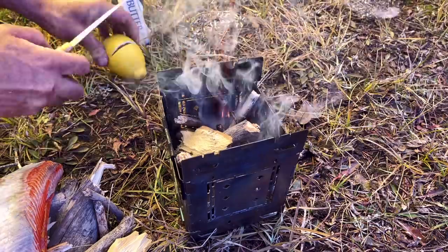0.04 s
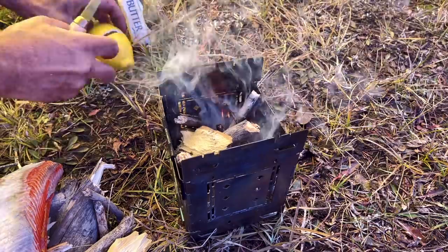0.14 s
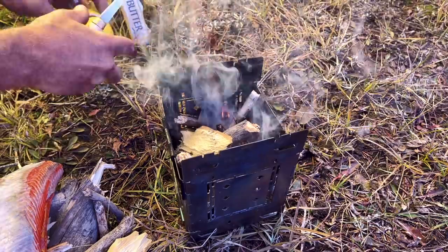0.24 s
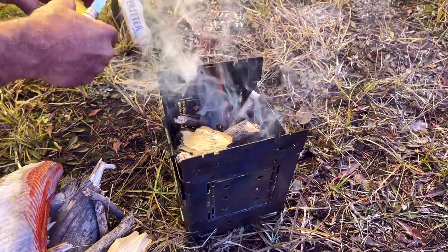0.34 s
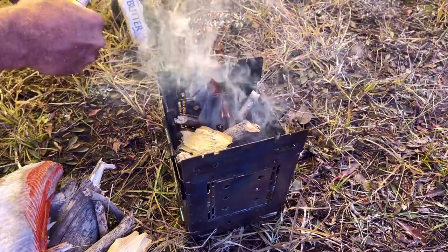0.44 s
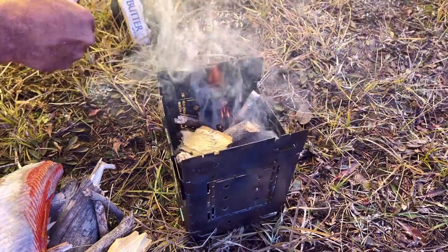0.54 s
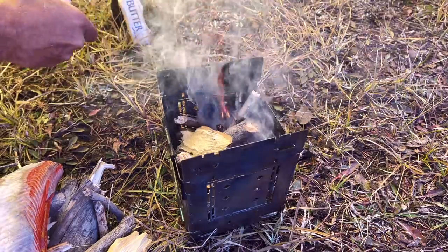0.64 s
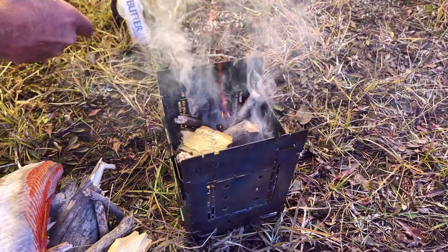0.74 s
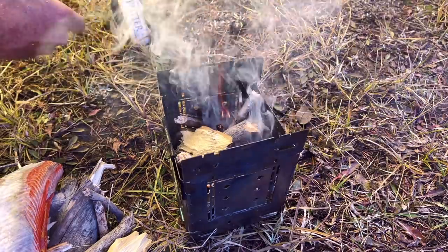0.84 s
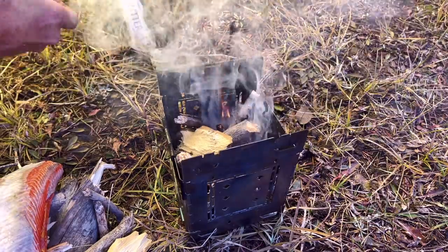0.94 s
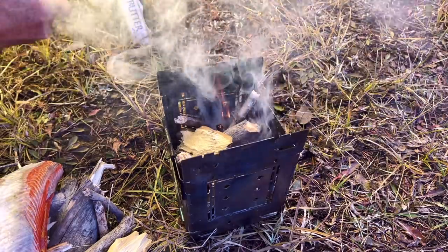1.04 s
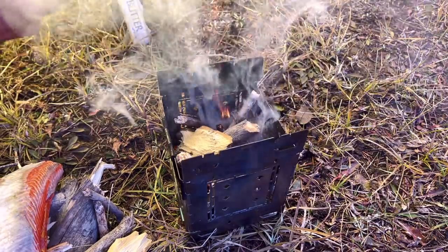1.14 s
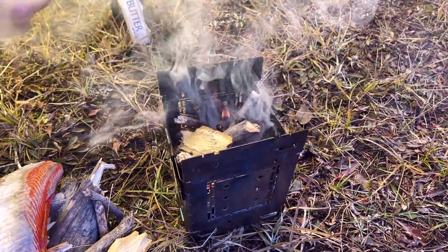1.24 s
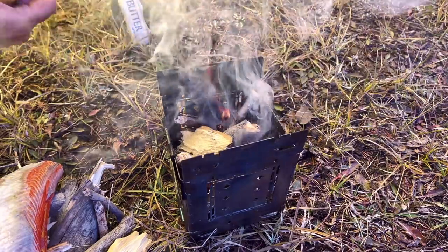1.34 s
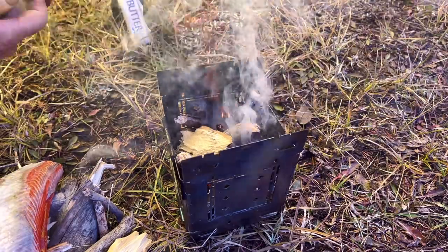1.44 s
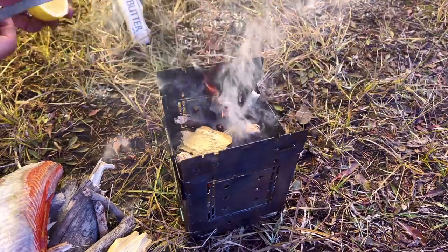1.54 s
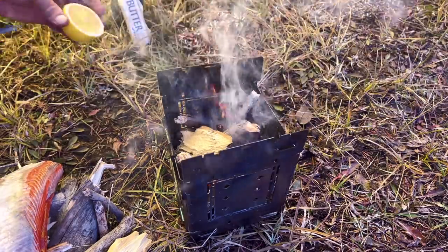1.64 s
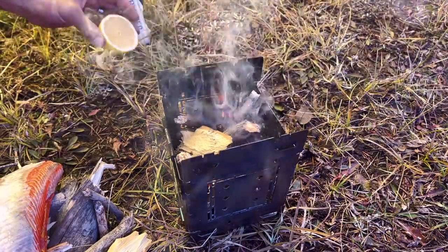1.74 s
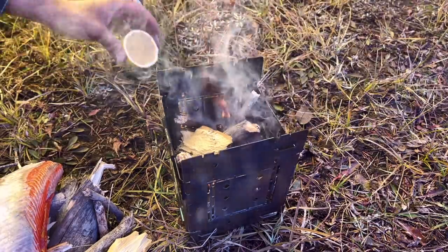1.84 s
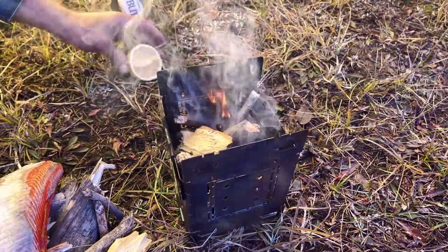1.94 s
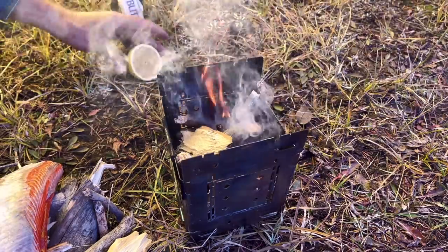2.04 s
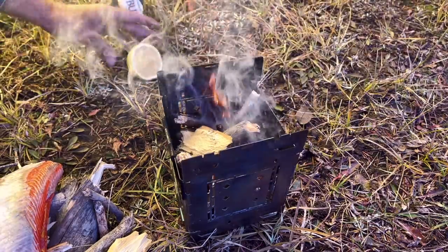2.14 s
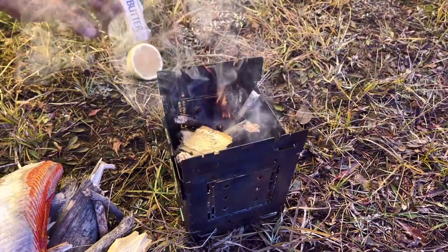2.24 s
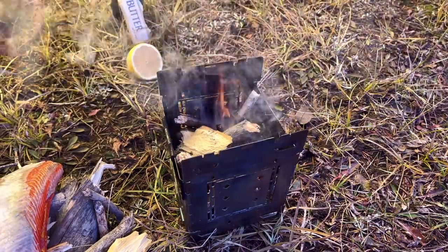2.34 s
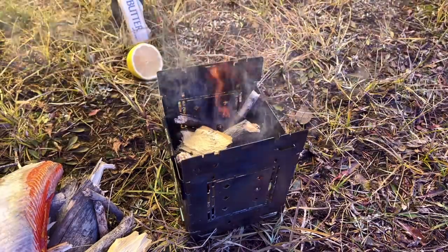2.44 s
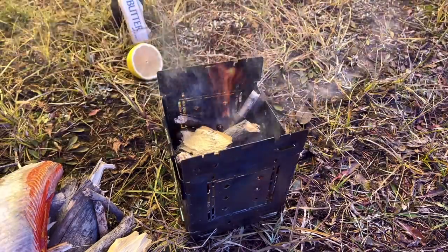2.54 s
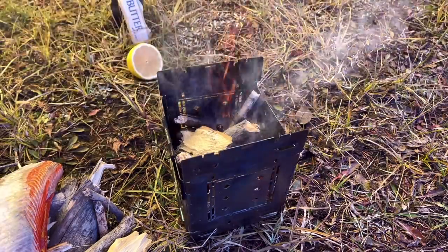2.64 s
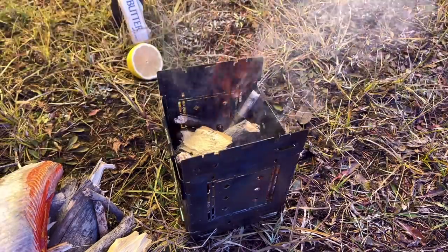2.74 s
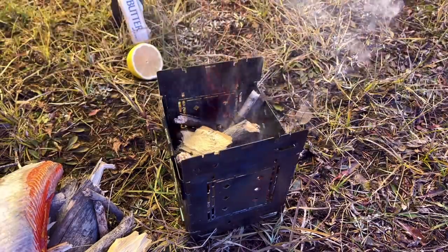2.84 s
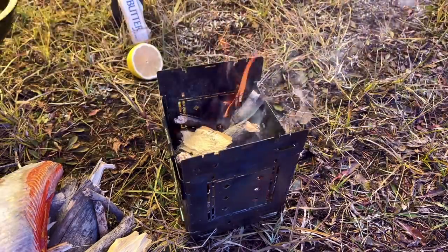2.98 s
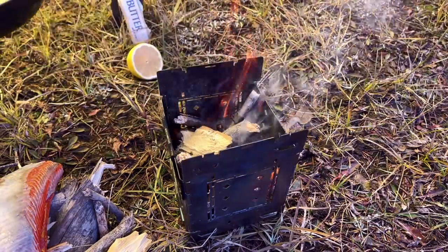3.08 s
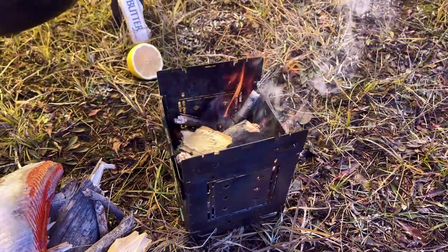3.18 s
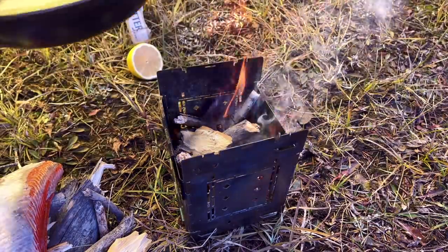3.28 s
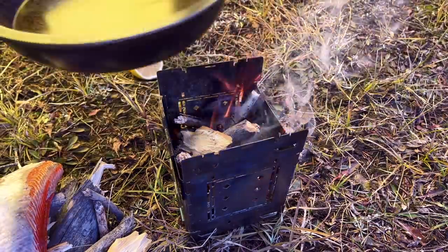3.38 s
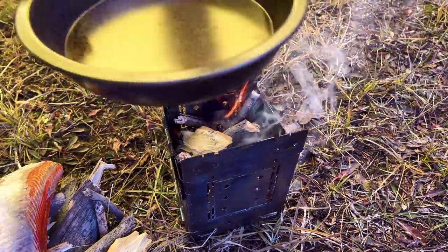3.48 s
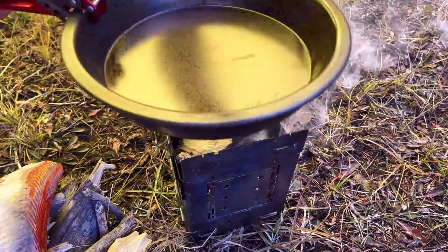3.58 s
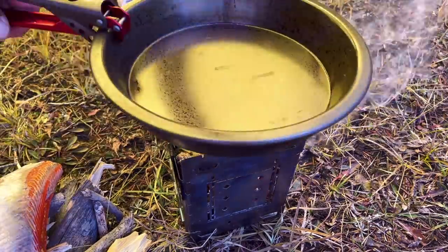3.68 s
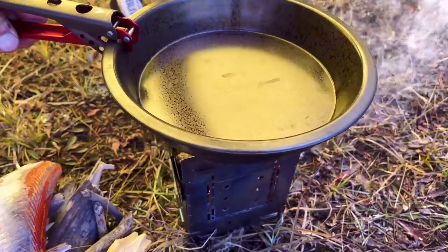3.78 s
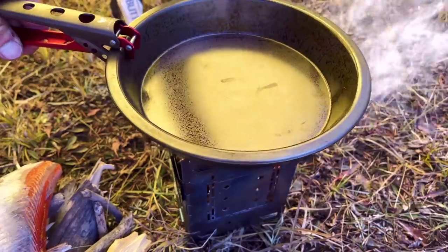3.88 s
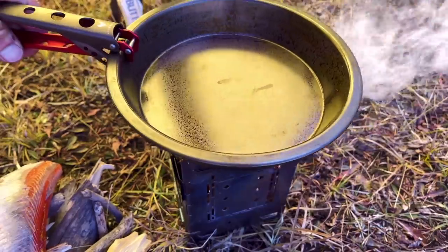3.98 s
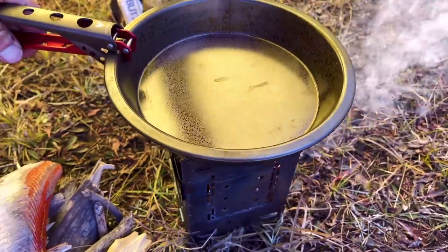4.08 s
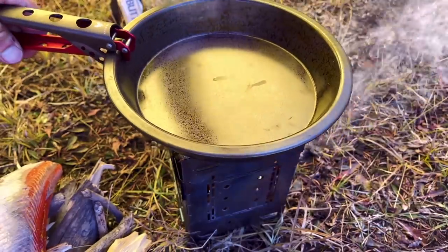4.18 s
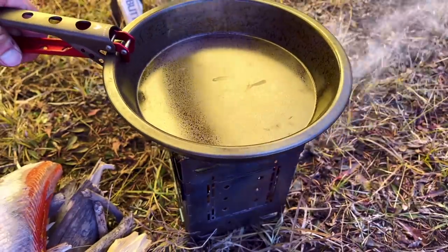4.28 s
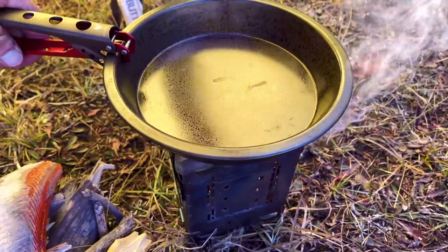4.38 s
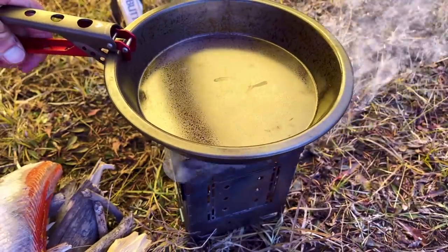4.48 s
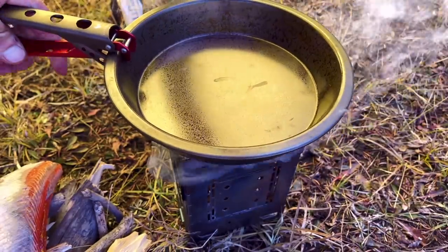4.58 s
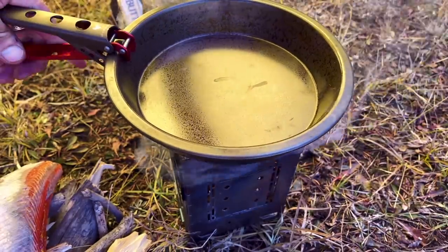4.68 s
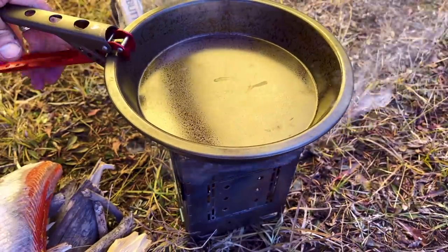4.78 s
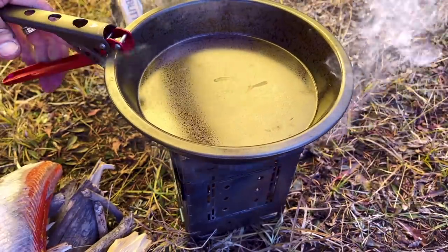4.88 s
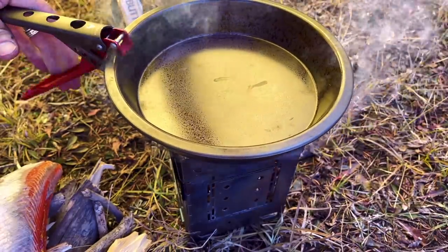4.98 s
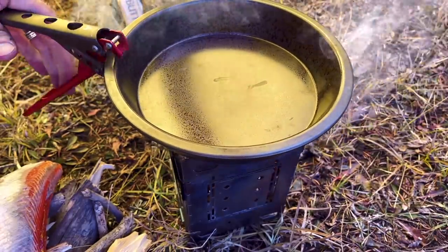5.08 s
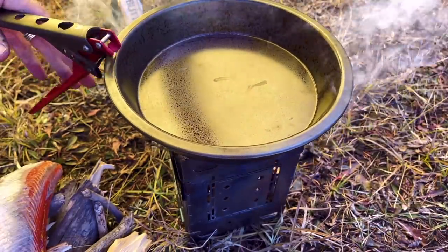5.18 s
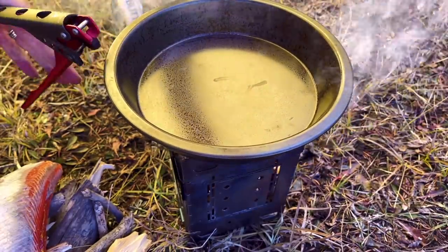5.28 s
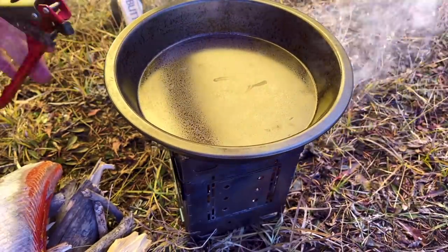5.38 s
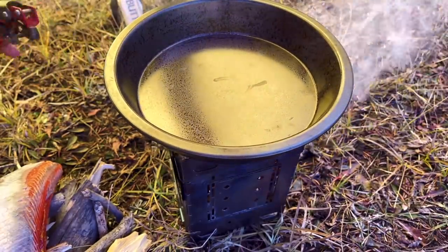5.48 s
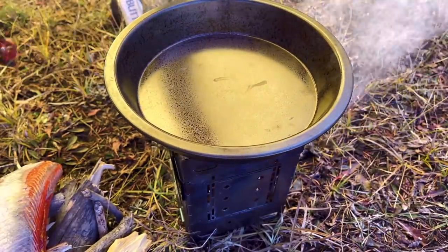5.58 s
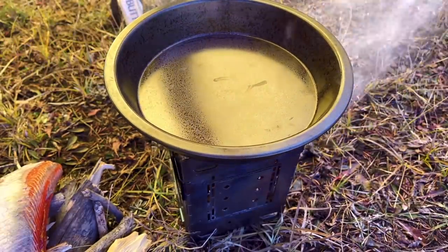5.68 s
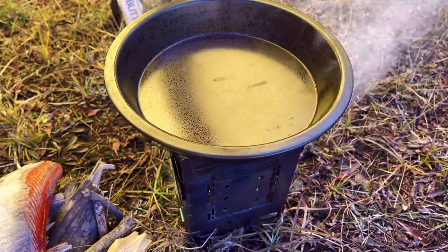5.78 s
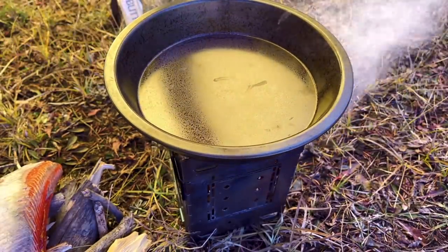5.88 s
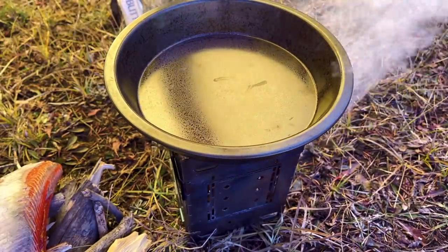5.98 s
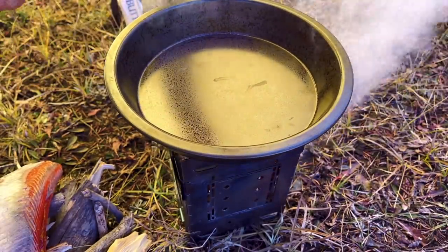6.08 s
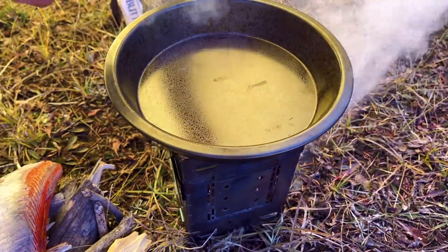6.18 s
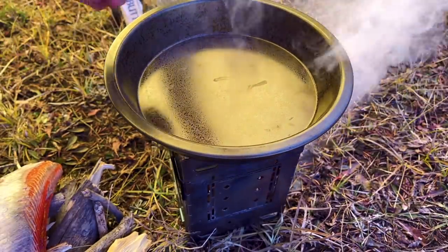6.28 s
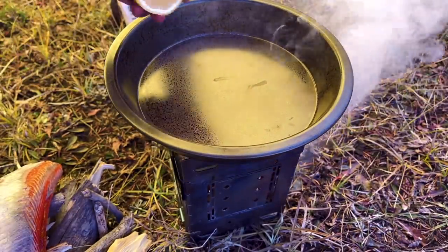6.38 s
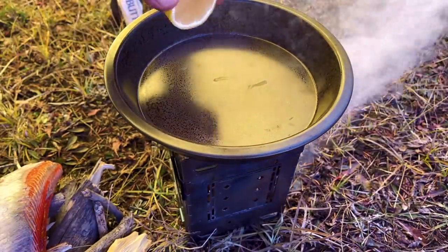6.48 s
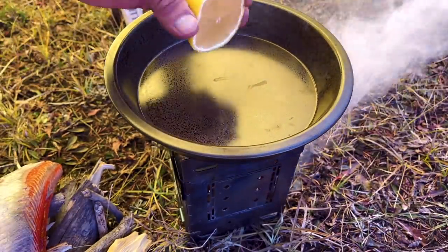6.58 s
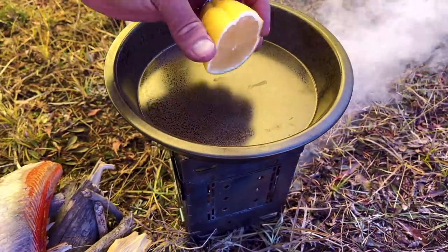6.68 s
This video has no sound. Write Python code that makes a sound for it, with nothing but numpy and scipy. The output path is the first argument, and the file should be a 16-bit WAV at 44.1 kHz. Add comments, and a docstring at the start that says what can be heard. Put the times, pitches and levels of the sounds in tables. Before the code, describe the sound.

A wood fire crackles and hisses in a small metal stove; a steel pan clanks down on top, then a sizzle swells.

```python
"""On grass, close to a small sheet-metal stove, twigs burn: flames flutter, embers rustle, steam from the
sap hisses and whistles, and bursting gas pockets pop and excite the stove's box. A steel pan is set down
with two clanks, slid into place, and its gripper is worked loose; impact and friction drive the metal's
modes. Then a wide, grainy hiss swells. The loudest blows overload the recorder."""
import sys
import numpy as np
from scipy import signal
from scipy.io import wavfile
from scipy.ndimage import uniform_filter1d

SR = 44100
rng = np.random.default_rng(int(sys.argv[2]) if len(sys.argv) > 2 else 0)


def int16_out(signal):
    """Quantize to a 16-bit WAV file."""
    q = np.round(np.clip(np.atleast_2d(signal).T, -1, 1) * 32767)
    wavfile.write(sys.argv[1], SR, q.astype(np.int16))


N = 296352

# How hard the fire burns. Each row: time in seconds, base levels of the flames and of the sap hiss in dB.
FIRE_LEVELS = [(0.0, -43.5, -44.5), (1.19, -47.5, -44.5), (1.52, -41, -43.5), (1.94, -44, -46.5),
               (2.37, -37, -45), (2.6, -43.5, -43), (2.92, -46.5, -47), (3.26, -47.5, -44.5),
               (4.02, -44.5, -50.5), (4.25, -40.5, -48), (4.81, -44, -49), (5.15, -37.5, -50.5),
               (5.48, -44, -48.5), (5.8, -44, -45.5)]
# Noise spectra of flames, embers, sap and the wide hiss. Each row: frequency in Hz, relative density in dB.
FLAME_SPECTRUM = [(18, -50), (30, -17), (140, 0.5), (377, -7.5), (490, -3.5), (700, -20), (910, -55),
                  (1540, -120)]
EMBER_SPECTRUM = [(350, 8.5), (600, -4), (818, 1), (1030, -11), (1410, 5.5), (1690, -7.5), (1900, -7.5),
                  (2800, -37), (3640, -73), (6160, -120)]
SAP_SPECTRUM = [(1410, -2), (2400, -0.5), (3030, -5), (3340, -2), (7730, -0.5), (12700, -4), (15300, -6.5),
                (16100, -23), (16500, -39)]
WIDE_HISS_SPECTRUM = [(35, -44), (60, -24), (130, -5.5), (834, 0), (1990, -7), (2240, -4.5), (4320, -11.5),
                      (4750, -10.5), (8960, -12.5), (15400, -18.5), (16500, -49)]
# How the pan on top colours the fire. Each row: frequency in Hz, change in dB.
COVER_RESPONSE = [(300, -3), (600, 4), (1030, 5.5), (1400, -11.5), (2300, 8.5), (5000, -1), (15000, -3.5)]
# The longer jets of steam. Each row: start and length in seconds, strength in dB, whistle pitch in Hz.
STEAM_JETS = [(0.109, 0.088, -42.5, 10300), (0.268, 0.087, -44, 6800), (0.419, 0.089, -44, 9500),
              (0.492, 0.092, -44, 5800), (0.62, 0.093, -49, 11200), (0.737, 0.051, -41.5, 4350),
              (0.853, 0.086, -47, 13800), (1.03, 0.15, -46.5, 11900), (1.278, 0.072, -44, 6040),
              (1.343, 0.06, -53, 12800), (1.43, 0.073, -58, 13500), (1.255, 0.19, -54, 7560),
              (2.494, 0.25, -63, 7240), (1.714, 0.036, -42, 6000), (1.997, 0.082, -46.5, 9600),
              (2.117, 0.051, -52, 3420), (2.26, 0.046, -44.5, 3680), (2.315, 0.057, -42, 8200),
              (2.372, 0.09, -45, 4500), (2.671, 0.11, -45.5, 7200), (2.893, 0.059, -49, 9400),
              (3.306, 0.13, -50, 12100), (3.545, 0.032, -41, 5030), (3.707, 0.051, -46.5, 12300),
              (5.58, 0.05, -52, 3400)]
# Puffs of burning gas. Each row: start in seconds, peak in dB, pitch in Hz, 60 dB decay time in seconds.
GAS_PUFFS = [(0.368, -25, 312, 0.056), (0.768, -28, 342, 0.12), (1.071, -28.5, 253, 0.089),
             (1.303, -29.5, 420, 0.054), (1.34, -23.5, 182, 0.047), (1.518, -34, 320, .06),
             (1.874, -22, 410, 0.022), (2.119, -23.5, 302, 0.045), (2.286, -24.5, 460, 0.1),
             (2.397, -23.5, 528, 0.11), (2.432, -24, 284, 0.061), (2.584, -30, 302, 0.039),
             (4.714, -25.5, 576, 0.049), (5.268, -25, 247, 0.048), (6.039, -17, 248, 0.02),
             (6.056, -23.5, 430, 0.016), (6.273, -17.5, 450, 0.011), (6.285, -16.5, 506, 0.011),
             (6.423, -19.5, 445, .025), (6.483, -21.5, 298, 0.022)]
# Hot metal ticks. Each row: start in seconds, frequency in Hz, peak in dB, 60 dB decay time in seconds.
METAL_TICKS = [(5.597, 3000, -30.5, 0.043), (5.597, 6350, -25, 0.029), (5.692, 4680, -6, 0.012),
               (5.695, 2250, -22, 0.038), (5.697, 4730, -13, 0.022)]
# The louder pops. Each row: start in seconds, peaks of snap, knock and thump in dB, snap centre in Hz.
WOOD_POPS = [(0.0283, -21.5, -45, -31, 8500), (0.0547, -36, -41, -20, 4390.0),
             (0.079, -21.5, -28, -37, 5830.0), (0.1017, -20.0, -22.5, -21, 4890.0),
             (0.1188, -16, -28, -43, 5970.0), (0.169, -19.0, -40.0, -48, 7790.0),
             (0.2131, -21.5, -32, -52, 6560.0), (0.2626, -9.5, -7, -4, 3930),
             (0.3943, -18, -16.5, -38, 3640), (0.417, -23, -25, -39, 3630),
             (0.4695, -27, -19.5, -20.5, 6330.0), (0.4757, -15, -38, -38, 8900),
             (0.53, -22, -41, -50.0, 9630.0), (0.5679, -11.0, -17, -29, 4800),
             (0.6, -18.0, -38, -24.0, 6530.0), (0.7173, -9.5, -18, -21, 3750),
             (0.7551, -11.5, -12, -29, 5000), (0.8826, -18.5, -41, -23.5, 9200),
             (0.9406, -22.5, -33.0, -31, 6700), (0.9863, -10, -54, -52, 7340),
             (1.0554, -19.5, -39, -49, 7860), (1.119, -18, -36, -50.0, 6800),
             (1.2199, -14.5, -24, -28, 5130), (1.2974, -21.0, -24.5, -29.0, 5940.0),
             (1.331, -11, -27, -36, 6900), (1.3724, -20.0, -35, -46.0, 10480.0),
             (1.4448, -22.5, -42, -47, 9210.0), (1.491, -15, -21.5, -24, 6800),
             (1.6487, -4.5, -11.5, -38, 6450), (1.8185, -27, -41, -35.0, 4280),
             (1.8666, -31, -19.5, -23, 4910.0), (1.939, -20, -22, -36, 4600),
             (2.1428, -36, -24, -30, 3720.0), (2.2074, -22, -31, -42.0, 9700),
             (2.2378, -19.0, -20, -35.0, 4430.0), (2.2493, -14, -22, -35, 7500),
             (2.2606, -8.5, -12.5, -27, 6350), (2.3302, -26, -25, -36, 7450.0),
             (2.389, -23, -24.5, -34, 3840.0), (2.4234, -24.5, -18, -37, 5550.0),
             (2.4441, -18, -15.5, -34, 4400), (2.5085, -15.5, -23, -32, 5770),
             (2.5764, -29.0, -24.5, -19.5, 4950.0), (2.6254, -18.5, -20, -26, 4140.0),
             (2.6444, -15, -26, -30, 6840), (2.828, -18.0, -28.5, -36, 7400), (2.9148, -26, -25, -22, 6240),
             (3.1331, -27.5, -32, -30.0, 5140), (3.2382, -22, -31, -50, 5920.0),
             (3.3106, -20.5, -36.0, -55, 9570.0), (3.5514, -7.5, -10, -8, 4940),
             (3.5622, -21, -21.5, -35, 10460.0), (3.6037, -21.5, -22, -27.5, 3380),
             (3.929, -33, -29, -33.5, 4600.0), (4.4254, -28, -33, -43, 5540.0),
             (4.5446, -23, -21.5, -19.5, 2960), (4.585, -21, -33, -19.5, 3820),
             (4.8109, -37, -45.0, -40, 9800), (5.3082, -27, -28.5, -47, 3110.0),
             (5.393, -22, -20.5, -24.5, 3500), (5.4422, -23, -23, -27, 3920),
             (5.5976, -13.0, -36, -49.0, 6800), (5.6456, -29, -37.0, -28.5, 5120.0),
             (5.693, -6, -37, -42, 5000), (5.7215, -22.5, -21, -27, 5610.0),
             (5.8147, -30, -28, -34, 5700.0), (5.9634, -21, -17, -24.5, 3490.0),
             (6.0005, -20, -20, -32.0, 4920), (6.12, -14, -24, -16, 4180), (6.2555, -6.5, -6, -8.0, 3500),
             (6.3594, -14, -24.5, -39, 4430), (6.505, -20.5, -31, -44.0, 4300),
             (6.6797, -20, -36, -50.0, 3150.0)]
# Modes of the stove's box, the box's extra mode under the pan, its loose walls, the pan and the gripper.
# Each row: frequency in Hz, relative level in dB, nominal 60 dB decay time in seconds.
BOX_MODES = [(650, -5.5, 0.013), (892, -14, 0.047), (1453, 5, 0.0096), (1890, -6.5, 0.0084),
             (2380, 1.5, 0.003)]
COVERED_BOX_MODES = [(970, 1.5, 0.013)]
WALL_MODES = [(500, -3, .022), (780, 0, .025), (1080, 0, .025)]
PAN_MODES = [(493, -11.5, 0.06), (530.5, -3, 0.096), (640, -4, 0.065), (807, 6.5, 0.043),
             (904, -1.5, 0.057), (1140, -1, 0.029), (1292, 0.5, .17), (1855, 0, .17), (1893, -7, .14),
             (2114, 1.5, 0.04), (2480, -7, 0.049), (3345, -4, 0.06), (4800, -5, 0.039)]
GRIPPER_MODES = [(3280, -13, 0.16), (5790, -1, 0.2), (7000, 4, 0.057), (7300, 6, 0.018), (7420, -3, 0.15),
                 (8500, 8, 0.021), (9500, 7, 0.0083), (10500, 0, 0.0087), (11200, 4.5, 0.029),
                 (13800, 3, 0.05), (15000, -10, .1)]
# Metal sliding on metal. Each row: start and length in seconds, drive levels of pan and gripper in dB.
METAL_SLIDES = [(4.303, 0.052, -46, -49), (4.454, 0.037, -45, -31.5), (4.7, .14, -45, -44),
                (4.897, .18, -39.5, -54), (5.111, 0.085, -31, -40.5)]
# Metal striking metal. Each row: start in seconds, peaks of pan, clatter, gripper and crack in dB,
# factor on the decay times of pan and gripper, hardness as a cut-off in Hz.
METAL_BLOWS = [(4.024, 9, 0.5, -5, -6, 0.66, 4940), (4.050, -12, -9, -55, -19, 1.1, 890),
               (4.093, -19, -18.5, -60, -34, 2.2, 900), (4.130, 3.5, 0.5, -50, -12.5, 0.52, 3930),
               (4.174, -30, -49, -60, -44, 0.43, 696), (4.194, -23, -47, -60, -43, 0.72, 754),
               (4.303, -21.5, -37, -60, -52, 1.6, 664), (4.458, -47, -47, -29, -23.5, 1.1, 4000),
               (4.477, -39, -33, -14, -24, 0.69, 4000), (4.921, -43, -24.5, -26, -22.5, 0.75, 4000),
               (4.999, -17, -10, -23, -4.5, 0.41, 1510), (5.087, -37, -40, -30, -16, .4, 4000),
               (5.103, 1, -11, -15, -9, 0.52, 5100), (5.142, -17, -13.5, -14, -20, 0.48, 3000),
               (5.190, -20.5, -30, -24, -28, 0.72, 4000)]
# The wide hiss swells, then steps down to a steady level. Each row: time in seconds, level in dB.
WIDE_HISS_LEVELS = [(5.424, -90), (5.524, -51.5), (6.304, -29), (6.3041, -35)]

COVER_START_S, COVER_LENGTH_S = 3.48, 0.61  # the pan closes the stove's mouth
FLUTTER_DB, RUSTLE_DB, HISS_DB = -2, -4.5, -3.5  # offsets from the fire's base levels
STEAM_SPITS, SMALL_POPS = 18, 70  # counts of brief spits of steam and of small pops, at random moments


def amp(db):
    return 10 ** (np.asarray(db) / 20)


def unit_rms(x):
    return x / np.sqrt(np.mean(x ** 2) + 1e-20)


def unit_peak(x):
    return x / abs(x).max(axis=-1, keepdims=True)


def envelope(times, db):
    return amp(np.interp(np.arange(N) / SR, times, db))


def spectrum_db(points, hz):
    known_hz, db = np.transpose(points)
    return np.interp(np.log(hz + 1), np.log(known_hz + 1), db)[:, None]


def band(x, low_hz, high_hz):
    edges = [low_hz, min(high_hz, .45 * SR)]
    return signal.sosfilt(signal.butter(2, edges, "band", fs=SR, output="sos"), x)


def add(mix, start, sound):
    part = mix[round(start * SR):][:len(sound)]
    part += sound[:len(part)]


def sap_db_at(when):
    times, _, sap_db = np.transpose(FIRE_LEVELS)
    return np.interp(when, times, sap_db)


def treble_hz(position):
    return 3000 * (12500 / 3000) ** position


def bursts(count, t60, size=2048):
    """Exponential decay: rows of noise start at once and lose 60 dB in t60 seconds."""
    return rng.standard_normal((count, size)) * amp(-60 * np.arange(size) / SR / t60)


def ring(drive, modes, decay_factor=1):
    """Modal superposition: each mode answers the drive as a damped oscillator."""
    out = np.zeros(len(drive))
    for hz, db, t60 in modes:
        radius, angle = amp(-60 / (t60 * decay_factor * SR)), 2 * np.pi * hz / SR
        feedback = [1, -2 * radius * np.cos(angle), radius ** 2]
        out += amp(db) * signal.lfilter([0, np.sin(angle)], feedback, drive)
    return out


def grainy_noise(spectrum, per_s, spread_db, t60, grain_share, patch_db, frame, under_pan=True):
    """Shot noise: tiny random bursts add in power over smooth noise, coloured in drifting patches."""
    clicks = amp(spread_db * np.minimum(rng.exponential(1, N), 4)) * (rng.random(N) < per_s / SR)
    t = np.arange(2048) / SR
    power = abs(signal.oaconvolve(clicks ** 2, amp(-120 * t / t60))[:N])
    grains = unit_rms(np.sqrt(power) * rng.standard_normal(N))
    noise = np.sqrt(1 - grain_share) * rng.standard_normal(N) + np.sqrt(grain_share) * grains
    framing = dict(fs=SR, nperseg=frame, noverlap=frame * 3 // 4)
    hz, times, bins = signal.stft(noise, **framing)
    patches = uniform_filter1d(rng.standard_normal(bins.shape[::-1]).T, frame // 32, axis=0)
    patches = unit_rms(uniform_filter1d(patches, 6000 // frame, axis=1))
    covered = under_pan * np.clip((times - COVER_START_S) / COVER_LENGTH_S, 0, 1)
    colour_db = spectrum_db(spectrum, hz) + patch_db * patches + covered * spectrum_db(COVER_RESPONSE, hz)
    return unit_rms(signal.istft(bins * amp(colour_db), **framing)[1][:N])


def steam_jets():
    """Steam forced through a crack whistles as narrow-band noise; returns jet strength and whistle."""
    when, duration, pitch = rng.random((STEAM_SPITS, 3)).T
    starts = when * N / SR
    spits = list(zip(starts, 0.012 * (.5 + duration), sap_db_at(starts) - 1.5, treble_hz(pitch)))
    rows = spits + STEAM_JETS
    strength, whistle = np.zeros(N), np.zeros(N)
    for breath, (start, length, db, hz) in zip(rng.standard_normal((len(rows), 14000)), rows):
        opening = amp(db) * signal.windows.tukey(round(length * SR), .3)
        edges = 0.87 * hz, 1.07 * hz
        tone = unit_rms(band(band(breath, *edges), *edges))
        add(strength, start, opening)
        add(whistle, start, opening * tone[:len(opening)])
    return strength, whistle


def fire():
    """Flames flutter, embers rustle, sap hisses; jets lift rustle and hiss by addition of power."""
    times, flame_db, sap_db = np.transpose(FIRE_LEVELS)
    jet, whistle = steam_jets()
    flutter = grainy_noise(FLAME_SPECTRUM, per_s=90, spread_db=5, t60=0.017,
                           grain_share=0.87, patch_db=4, frame=1024)
    rustle = grainy_noise(EMBER_SPECTRUM, per_s=140, spread_db=3, t60=0.015,
                          grain_share=0.45, patch_db=1.5, frame=512)
    hiss = grainy_noise(SAP_SPECTRUM, per_s=150, spread_db=-0.5, t60=0.015,
                        grain_share=0.66, patch_db=1.5, frame=256)
    flutter *= envelope(times, flame_db + FLUTTER_DB)
    rustle *= np.hypot(envelope(times, flame_db + RUSTLE_DB), amp(-1) * jet)
    hiss *= np.hypot(envelope(times, sap_db + HISS_DB), jet)
    return flutter + rustle + hiss + amp(-7) * whistle


def gas_puffs():
    """Burning gas expands in a soft-edged pulse of low noise."""
    out, t = np.zeros(N), np.arange(3000) / SR
    air = rng.standard_normal((len(GAS_PUFFS), len(t))) * (1 - np.exp(-t / 0.0018))
    for pulse, (start, db, hz, t60) in zip(air, GAS_PUFFS):
        puff = band(pulse * amp(-60 * t / t60), 0.44 * hz, 1.77 * hz)
        add(out, start, amp(db) * unit_peak(puff))
    return out


def metal_ticks():
    """Free vibration: each tick of hot metal is one damped sinusoid."""
    out, t = np.zeros(N), np.arange(3000) / SR
    for start, hz, db, t60 in METAL_TICKS:
        add(out, start, amp(db - 60 * t / t60) * np.sin(2 * np.pi * hz * t))
    return out


def wide_hiss():
    """Incoherent summation: dense grains of noise merge into a wide, grainy hiss that swells."""
    hiss_grains = grainy_noise(WIDE_HISS_SPECTRUM, per_s=1200, spread_db=3, t60=0.006,
                               grain_share=0.35, patch_db=1.1, frame=512, under_pan=False)
    return envelope(*np.transpose(WIDE_HISS_LEVELS)) * hiss_grains


def small_pops():
    """A random point process: rows like WOOD_POPS, with levels that follow the sap hiss."""
    when, pitch = rng.random((SMALL_POPS, 2)).T
    scatter_db = 3 * rng.standard_normal((SMALL_POPS, 3)).T
    starts = when * N / SR
    snap_db = -31 + sap_db_at(starts) - sap_db_at(0) + scatter_db[0]
    knock_db, thump_db = snap_db - 7 + scatter_db[1], snap_db - 10 + scatter_db[2]
    return list(zip(starts, snap_db, knock_db, thump_db, treble_hz(pitch)))


def wood_pops():
    """Sudden pressure release: a gas pocket snaps, knocks the stove's box and thumps the air inside."""
    rows = small_pops() + list(WOOD_POPS)
    out, count = np.zeros(N), len(rows)
    ruptures = bursts(count, 0.0075) + amp(-25) * bursts(count, 0.061)  # the tail is escaping steam
    jolts = band(bursts(count, 0.0053), 260, 5500)
    thumps = unit_peak(band(bursts(count, 0.011), 204, 730))
    for k, (start, snap_db, knock_db, thump_db, hz) in enumerate(rows):
        snap = unit_peak(band(ruptures[k], 2540, 2.29 * hz) + band(ruptures[k], 0.64 * hz, 1.35 * hz))
        modes = BOX_MODES + COVERED_BOX_MODES if start > COVER_START_S else BOX_MODES
        knock = unit_peak(ring(jolts[k], modes))
        add(out, start, amp(snap_db) * snap + amp(knock_db) * knock + amp(thump_db) * thumps[k])
    return out


def pan_slides():
    """Friction: rough rims drive pan and gripper, damped by the contact, and grate the stove's walls."""
    roughness = amp(3 * unit_rms(uniform_filter1d(rng.standard_normal(N), size=150)))
    pan_rub, gripper_rub = band(rng.standard_normal((2, N)) * roughness, 380, 18000)
    pan_force, gripper_force = np.zeros((2, N))
    for start, length, pan_db, gripper_db in METAL_SLIDES:
        progress = np.linspace(0, 1, round(length * SR))
        stroke = np.minimum(progress / 0.22, 1) * amp(-11 * progress ** 2)  # presses down, then eases
        add(pan_force, start, amp(pan_db) * stroke)
        add(gripper_force, start, amp(gripper_db) * stroke)
    out = amp(2.5) * pan_force * unit_rms(ring(gripper_rub, WALL_MODES))
    for rub, force, modes, decay_factor in ((pan_rub, pan_force, PAN_MODES, .8),
                                            (gripper_rub, gripper_force, GRIPPER_MODES, .3)):
        out += ring(rub * force, modes, decay_factor) / np.std(ring(rub, modes, decay_factor))
    return out


def pan_blows():
    """Impact excitation: a contact rings pan and gripper, rattles the loose walls and cracks the air."""
    out, count, size = np.zeros(N), len(METAL_BLOWS), 12000
    impulses = abs(bursts(count, 0.000049, size))
    chatter = band(bursts(count, 0.00048, size), 2000, 14500)
    cracks = unit_peak(band(bursts(count, 0.044, size), 810, 9300))
    shakes = band(bursts(count, 0.054, size), 437, 2300)
    for k, blow in enumerate(METAL_BLOWS):
        start, pan_db, clatter_db, gripper_db, crack_db, decay_factor, hardness_hz = blow
        pan = amp(pan_db) * unit_peak(ring(band(impulses[k], 410, hardness_hz), PAN_MODES, decay_factor))
        clatter = amp(clatter_db) * unit_peak(ring(shakes[k], WALL_MODES))
        gripper = amp(gripper_db) * unit_peak(ring(chatter[k], GRIPPER_MODES, decay_factor))
        add(out, start, pan + clatter + gripper + amp(crack_db) * cracks[k])
    return out


def scene():
    """Linear superposition: the stove, the pan and the wide hiss add in one channel."""
    stove = fire() + wood_pops() + gas_puffs() + metal_ticks()
    return (stove + pan_blows() + pan_slides() + wide_hiss())[None]


def record(dry):
    """Saturation: after the microphone's bass roll-off, the input stage clips; a low-pass follows."""
    thinned = signal.sosfilt(signal.butter(2, 60, "high", fs=SR, output="sos"), dry)
    ceiling, knee = 0.77, 6.0
    clipped = thinned / (1 + abs(thinned / ceiling) ** knee) ** (1 / knee)
    low_pass = signal.firwin(255, 16300, window=("kaiser", 8), fs=SR)
    return signal.oaconvolve(clipped, low_pass[None], "same")


dry = scene()
out = record(dry)
int16_out(out)
```